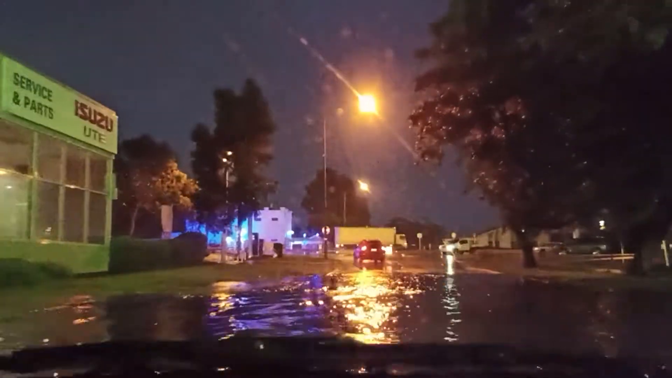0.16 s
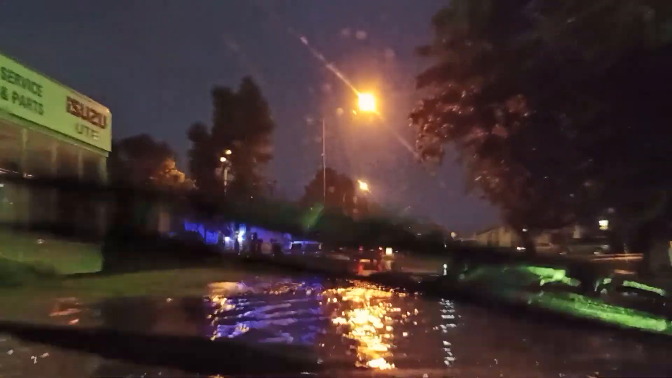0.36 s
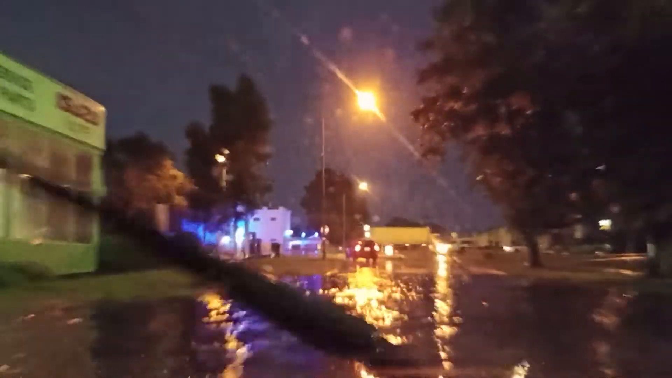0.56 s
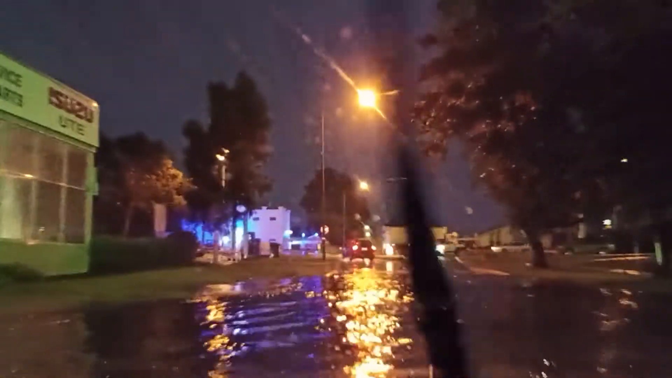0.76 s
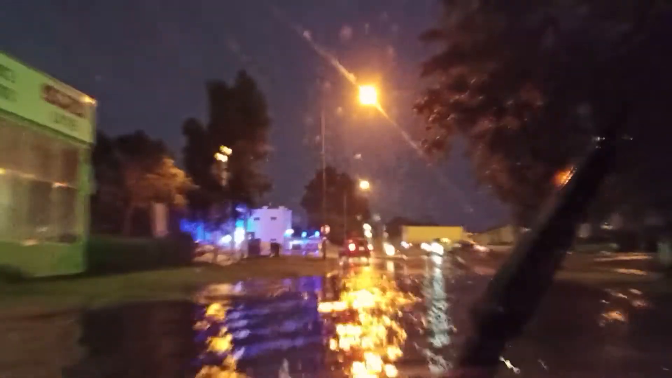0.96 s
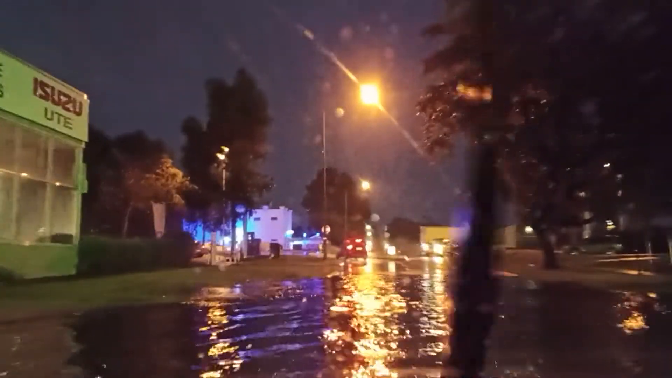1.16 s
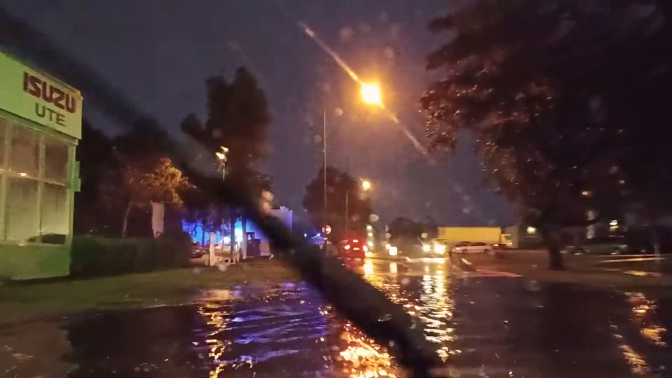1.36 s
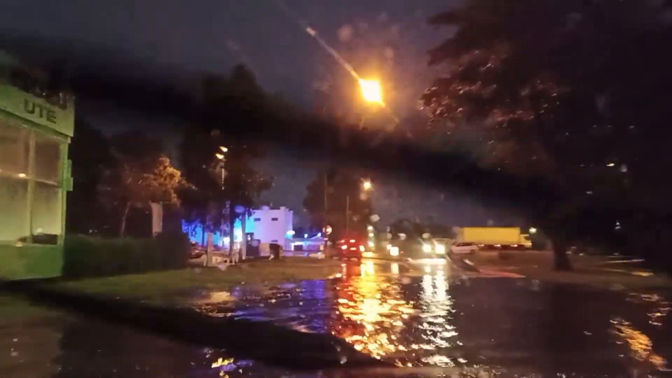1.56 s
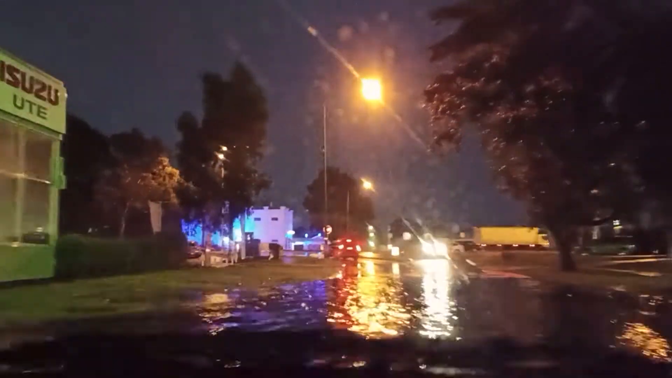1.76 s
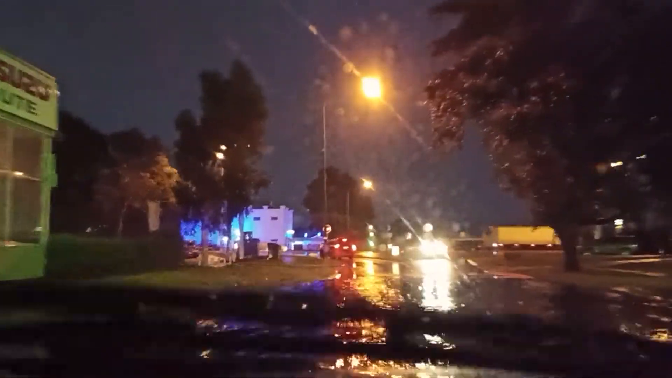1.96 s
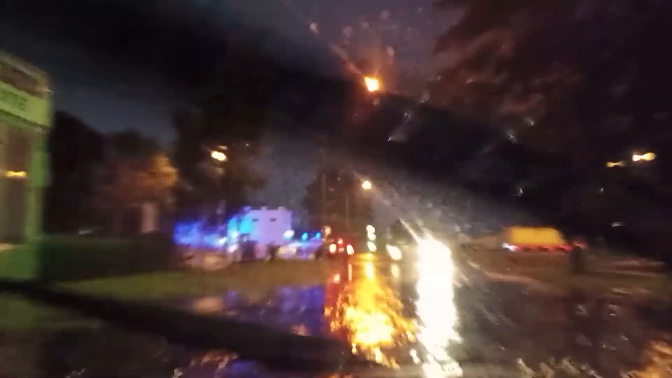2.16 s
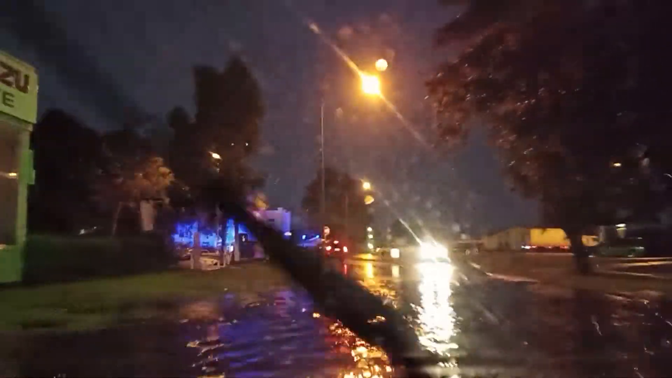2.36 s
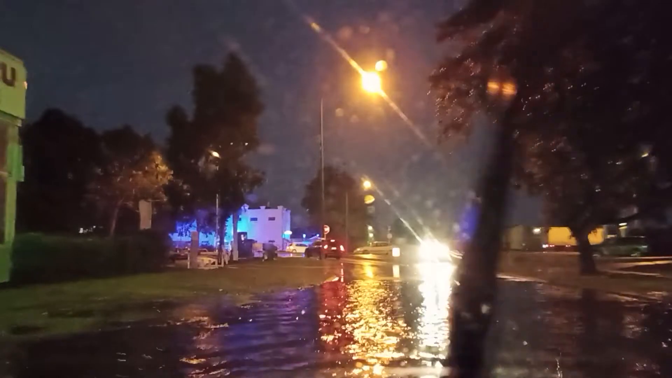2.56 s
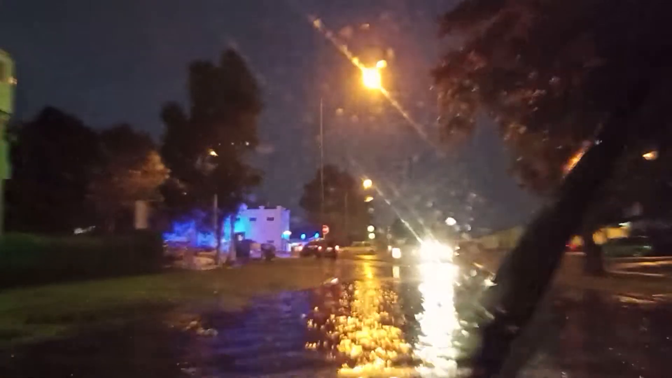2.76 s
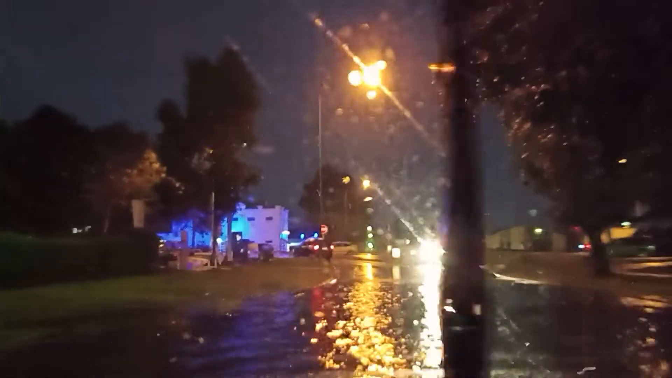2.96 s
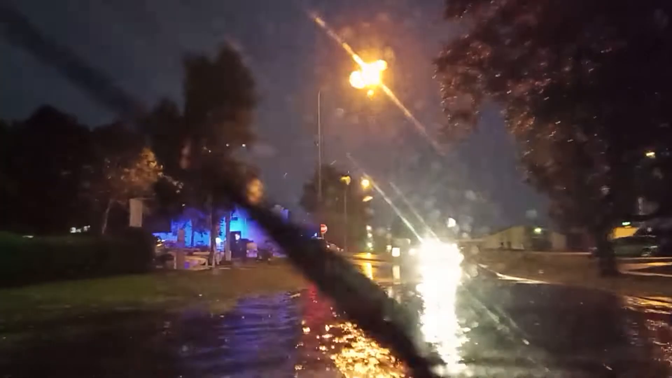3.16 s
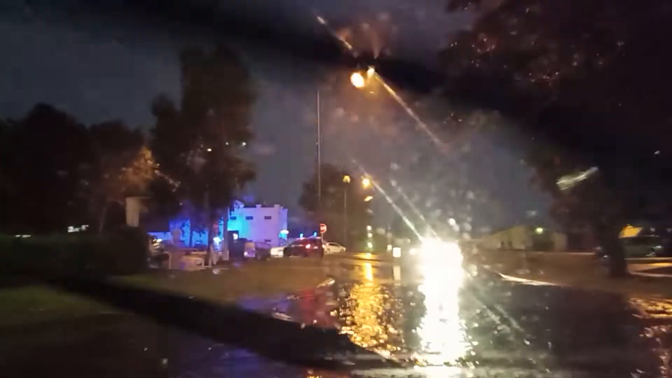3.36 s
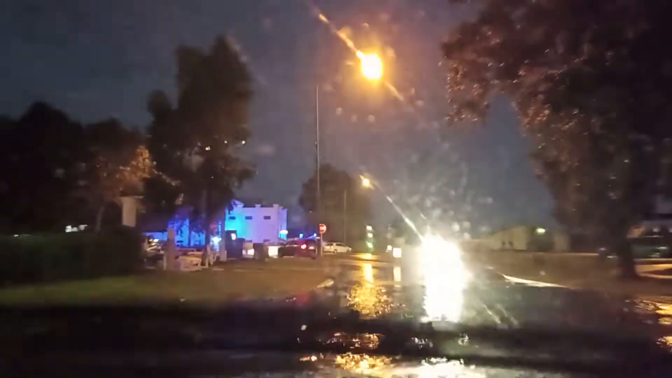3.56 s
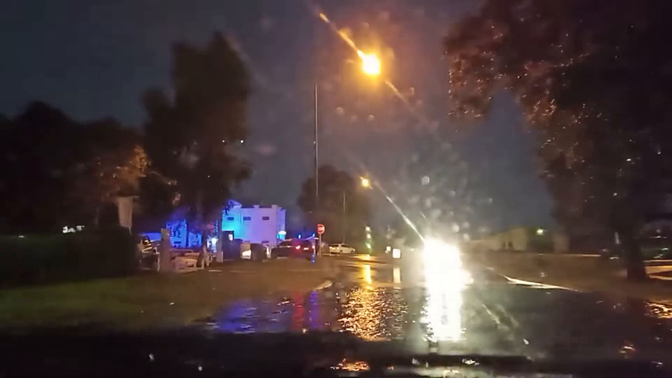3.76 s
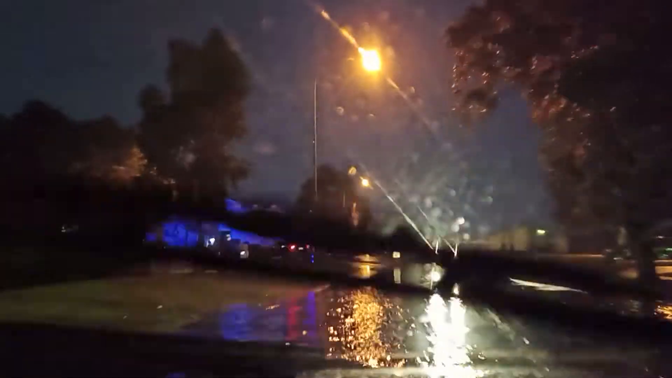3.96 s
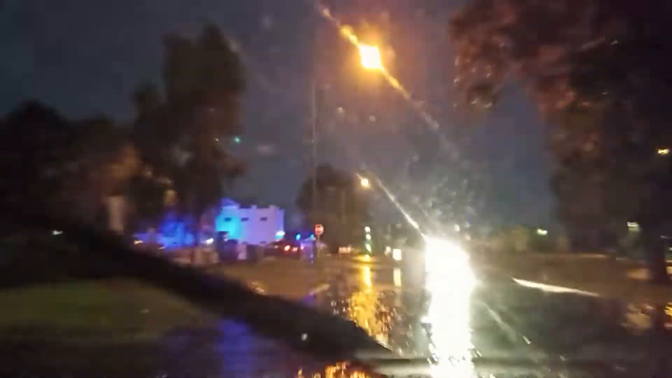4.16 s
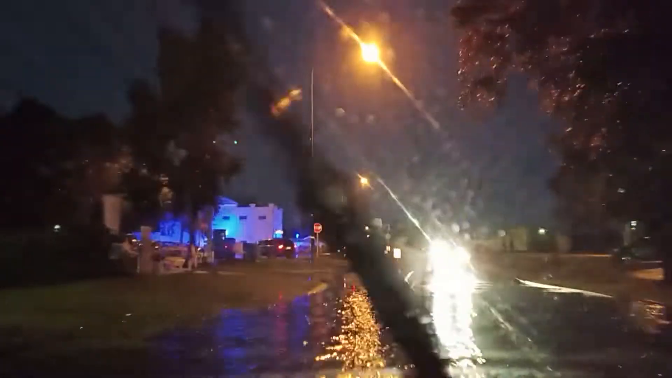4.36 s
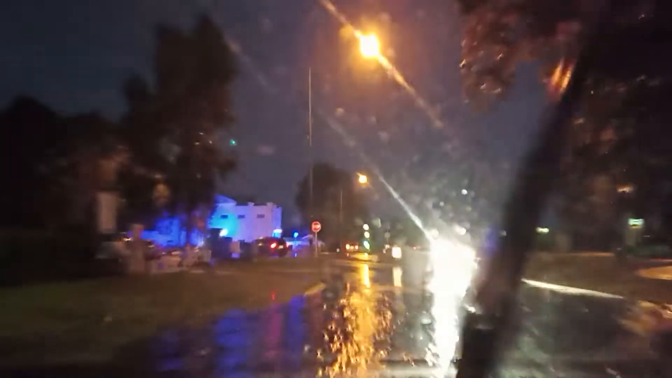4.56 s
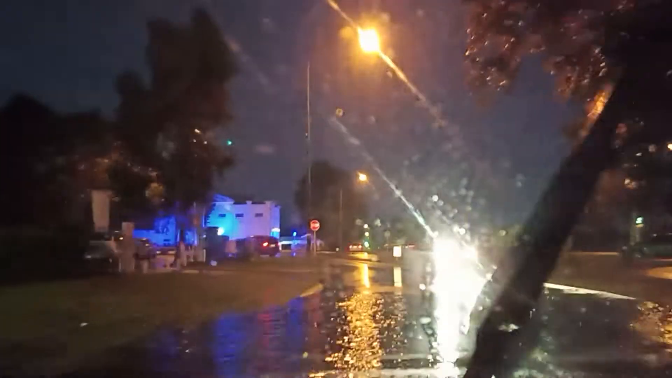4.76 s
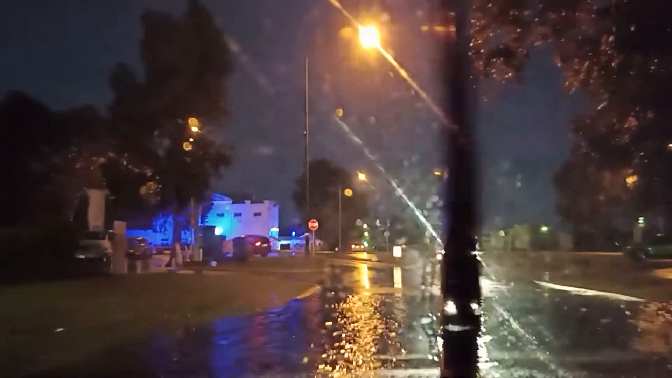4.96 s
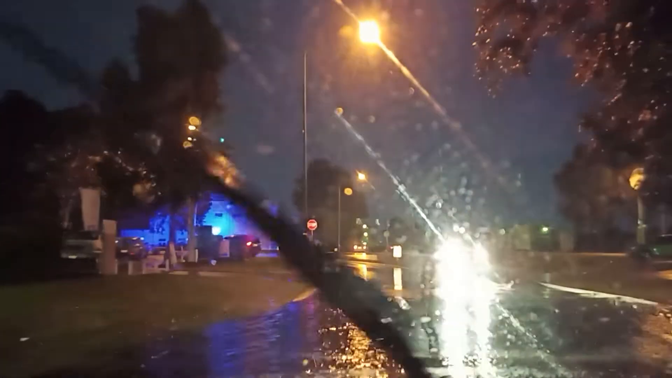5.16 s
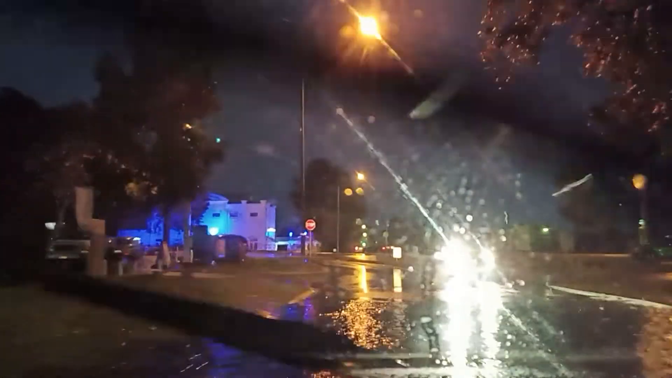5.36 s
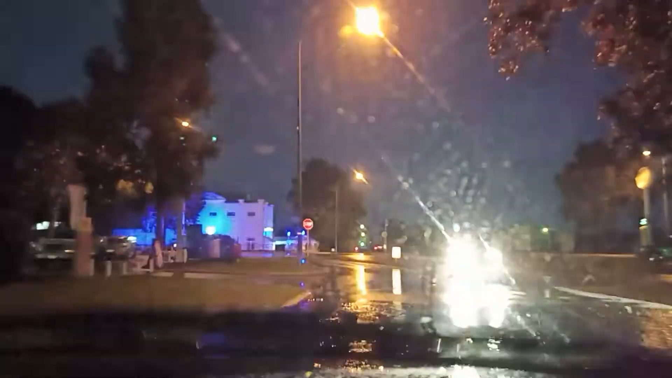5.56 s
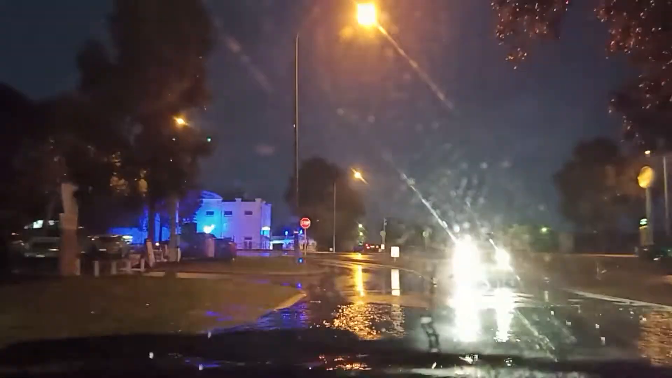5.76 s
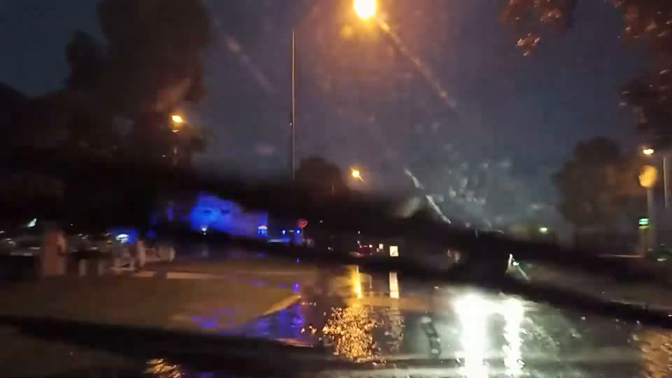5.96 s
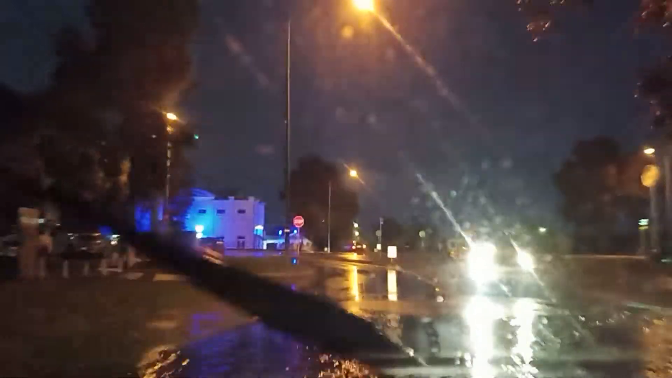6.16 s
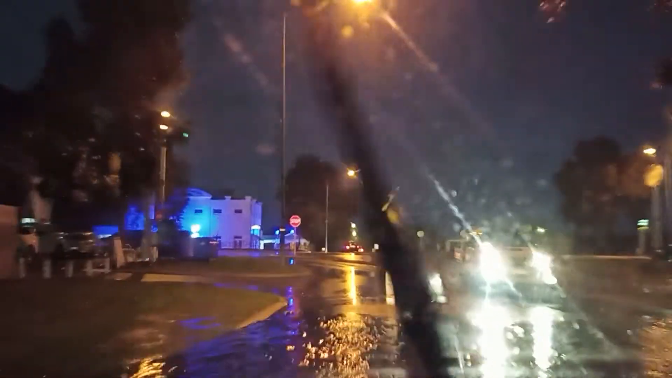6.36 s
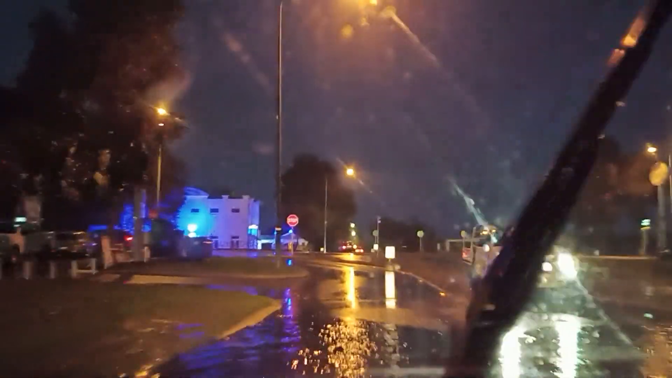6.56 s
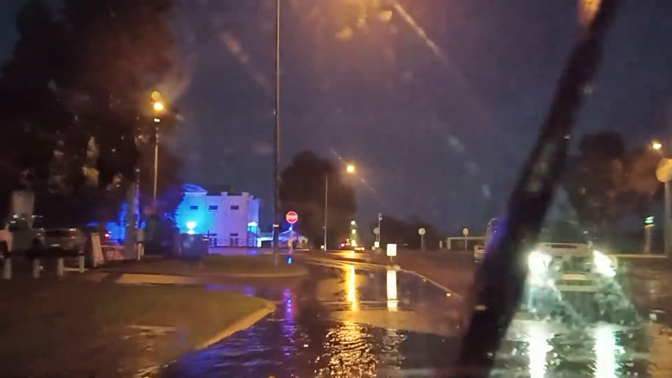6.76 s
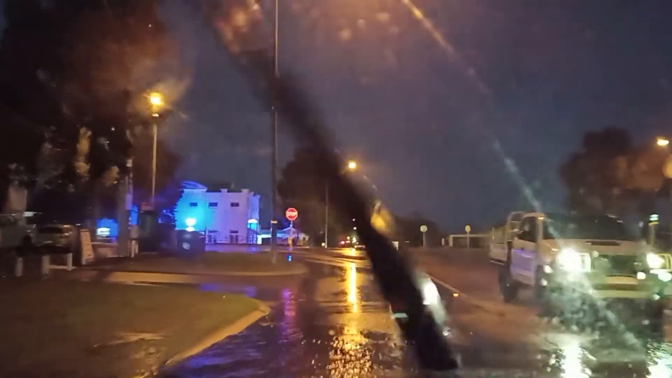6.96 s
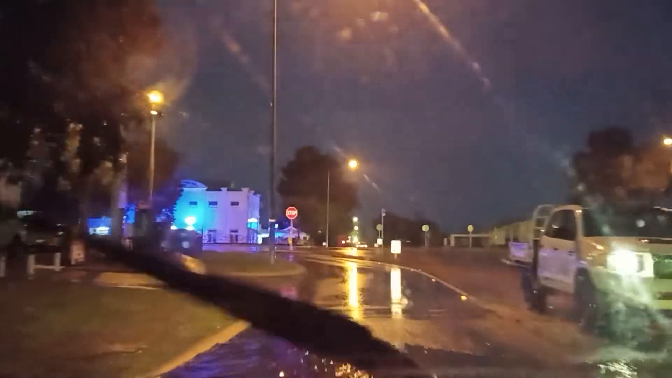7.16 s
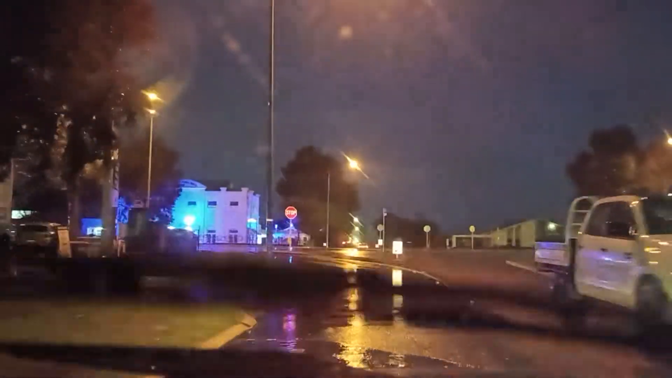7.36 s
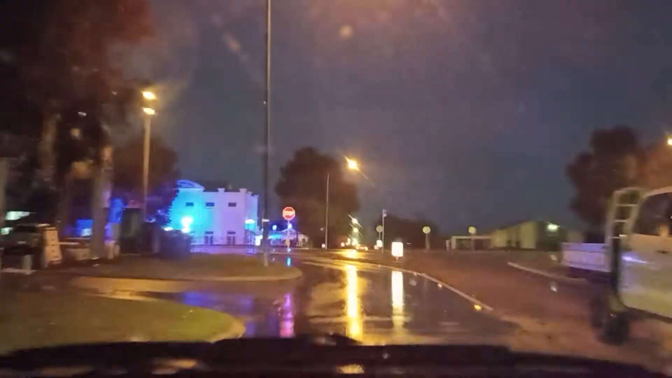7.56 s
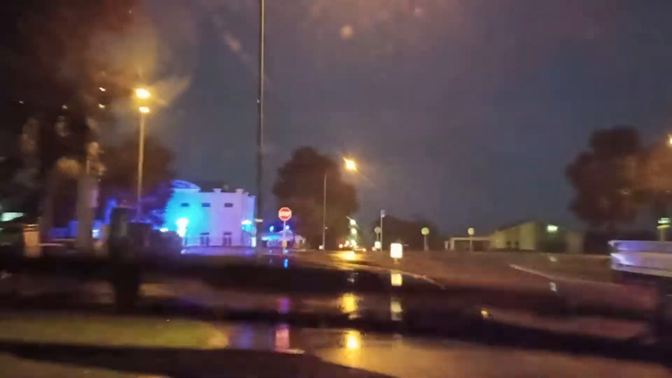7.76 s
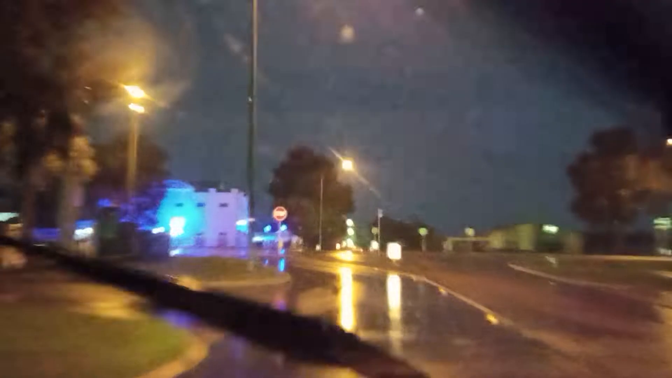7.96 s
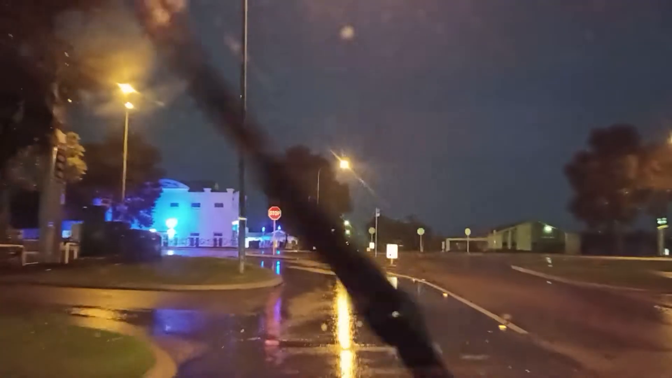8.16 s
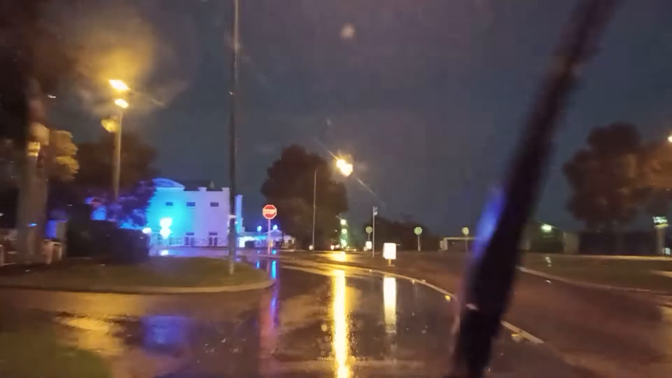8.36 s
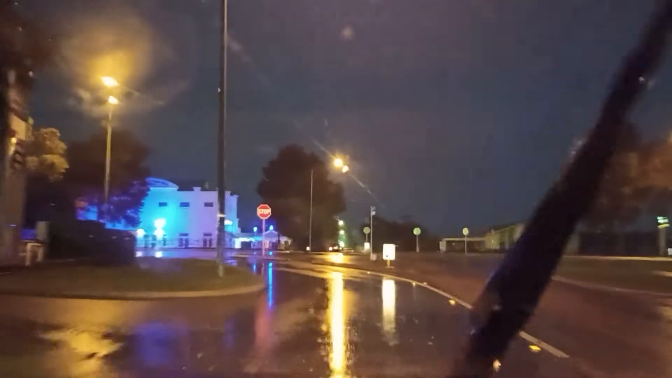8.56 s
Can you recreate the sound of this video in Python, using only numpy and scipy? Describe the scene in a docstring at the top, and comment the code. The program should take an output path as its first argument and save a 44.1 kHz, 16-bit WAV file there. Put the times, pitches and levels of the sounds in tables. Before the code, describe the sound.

From the front seat on a flooded road in rain, dark low water roar and engine hum fill the small dry cabin. Wiper blades flip with a dull thud and rubbery swish at the bottom, knock again at the top, and rattle in their joints. A thin bright buzz rides on the engine's vibration until around five seconds; then the engine eases off and the water swells briefly before settling.

```python
"""The engine of a car drones as harmonics of its firing rate, then eases off on a flooded road in heavy rain.
Water churns under the floor, tyres rumble and rain hisses on the body: shaped noise mixed with random impacts.
The wipers swish as gated noise, and knock at the turns of their stroke as damped panel tones, slaps and clicks.
A small loose part near the microphone buzzes: each shake of the car excites its resonances with a brief chatter."""
import sys
import numpy as np
from scipy import signal
from scipy.fft import rfft, irfft, next_fast_len
from scipy.io import wavfile
from scipy.ndimage import uniform_filter1d, map_coordinates

SR = 44100
rng = np.random.default_rng(int(sys.argv[2]) if len(sys.argv) > 2 else 0)


def output_pcm(signal):
    """Save a mono or channel-first signal as 16-bit PCM at the path in sys.argv[1].

    Samples are clipped to [-1, 1] before scaling.
    """
    pcm = np.clip(np.atleast_2d(signal).T, -1, 1) * 32767
    wavfile.write(sys.argv[1], SR, np.round(pcm).astype(np.int16))


N = 383669  # length in samples

# Engine course. Each row: time in seconds, firing rate in Hz, drone level in dB.
ENGINE_COURSE = [(0, 62.4, -24.5), (.4, 60.92, -22.5), (1.04, 59.6, -20.5), (1.75, 61.6, -23.5),
                 (2.2, 61.1, -24.5), (2.55, 58.6, -24), (3.08, 61.57, -23.5), (3.75, 62.16, -27),
                 (4.13, 56.78, -22), (4.6, 58.9, -25), (5.08, 62.7, -29), (5.45, 60, -27),
                 (5.75, 61.1, -27), (6.05, 65.8, -36), (6.6, 58, -40), (7, 49.07, -39.5), (8, 47.5, -35),
                 (8.7, 53, -35.5)]
# Air mode of the cabin: centre and half-width in Hz. It passes the second harmonic best at its centre.
BOOM_HZ, BOOM_WIDTH_HZ = 118.3, 7.3
SECOND_DB, THIRD_DB = -9, -17  # harmonics relative to the drone, the second at the centre of the mode

# All spectra below are relative: each shapes a sound whose level is set elsewhere.
# Water course. Each row: time in seconds, churn level in dB, wash level in dB.
WATER_COURSE = [(0, -31, -36), (1, -29, -35), (3.5, -30.5, -36.5), (5, -29, -34), (6.3, -27, -33.5),
                (7.4, -30.5, -36), (8.7, -31, -38)]
# Water against the floor. Each row: frequency in Hz, density in dB per Hz.
CHURN_SPECTRUM = [(52, -17.5), (88, -0.5), (108, 0), (129, 3), (150, -0.5), (187, 1), (265, -7),
                  (300, -10.5), (330, -5.5), (430, -21.5), (730, -120)]
# Spray in the wheel arches. Each row: frequency in Hz, density in dB per Hz.
WASH_SPECTRUM = [(60, -43), (150, -10), (260, -2.5), (300, -1), (390, -5.5), (530, -6.5), (600, -11),
                 (820, -19), (1100, -24.5), (1450, -27), (1750, -27.5), (2300, -47), (6000, -110)]
# Tyre course. Each row: time in seconds, rumble level in dB.
ROAD_COURSE = [(0, -61), (3.5, -49), (5.3, -40), (6.7, -37), (7.3, -37.5), (8.7, -36)]
# The tyres heard through the body. Each row: frequency in Hz, density in dB per Hz.
RUMBLE_SPECTRUM = [(15, -50), (25, -21), (35, -8), (48, -1), (62, 0), (78, -2), (100, -9), (140, -25),
                   (400, -120)]
# Rain course. Each row: time in seconds, hiss level in dB.
RAIN_COURSE = [(0, -55.5), (2.5, -51), (4.3, -53), (5.4, -51.5), (8.7, -49.5)]
# Rain heard through the glass. Each row: frequency in Hz, density in dB per Hz.
HISS_SPECTRUM = [(1120, -25), (1900, -2.5), (2460, -4), (2730, -2.5), (4220, -1.5), (4820, -2.5),
                 (5600, -7), (6070, -6), (6750, -11), (8270, -9), (10600, -25), (12200, -24.5),
                 (14800, -20), (15800, -30)]

# Wiper cycles. Each row: flip at the foot of the glass in seconds, relative swish level in dB, swish rise
# in seconds, relative drag level in dB, turn at the top in seconds, relative swish level there in dB,
# relative thud level there in dB.
WIPER_CYCLES = [(.334, -26.5, 0.081, -32.5, 1.018, -32.5, -10), (2.011, -23, .018, -26.5, 2.8, -29.5, -5.5),
                (3.958, -26, 0.093, -27, 4.646, -31, -11.5), (5.872, -23, 0.02, -27, 6.711, -30, -5),
                (7.775, -24.5, .05, -32.5, 8.533, -33, -9.5)]
# Rubber juddering on the windscreen. Each row: frequency in Hz, density in dB per Hz.
SWISH_SPECTRUM = [(88, -47), (150, -6), (352, 0), (417, -14.5), (511, -5.5), (661, -18.5), (740, -14.5),
                  (1150, -36), (2200, -57), (2860, -66), (4840, -120)]
# The wet edge of the swish. Each row: frequency in Hz, density in dB per Hz.
SPRAY_SPECTRUM = [(200, -38), (500, -33), (1000, 7), (1700, 1), (2400, -6), (4000, -5), (6500, -15),
                  (8200, -14), (10000, -38), (15000, -33)]
SWISH_LAG_S, SWISH_FALL_S = 0.0067, 0.053  # the swish peaks just after the flip and dies away
TOP_RISE_S, TOP_FALL_S = 0.022, 0.054  # the swish at the top of the glass
DRAG_LAG_S, DRAG_WIDTH_S = 0.2, 0.2  # the upstroke pulls hardest this long after the flip

# Knocks of the wiper linkage. Each row: time in seconds, relative thud level in dB, pitch in Hz,
# relative slap level in dB, relative click level in dB.
LINKAGE_KNOCKS = [(.4444, -13, 111, -23.5, -31), (0.5354, -9.5, 182, -28, -24.5),
                  (2.164, -10.5, 125, -27, -26.5), (2.2557, -7.5, 139, -31, -19.5),
                  (4.127, -7, 151, -28, -25.5), (4.238, -17.5, 164, -38, -32.5),
                  (4.531, -22, 110, -27, -24), (4.723, -11, 168, -26, -43), (6.027, -19, 200, -23, -28.5),
                  (6.1, -13.5, 147.5, -30, -26.5), (6.2228, -16, 177, -28, -21),
                  (7.886, -15, 108.2, -24, -30.5), (7.979, -11.5, 204, -24.5, -32),
                  (8.262, -17, 201.2, -32, -35), (8.451, -21.5, 318, -32, -28)]
# The glass under a blow. Each row: frequency in Hz, density in dB per Hz.
SLAP_SPECTRUM = [(120, 2), (280, -5.5), (520, -3), (800, -10), (1500, -20.5), (2500, -32), (6000, -56)]
# The snap of a wiper joint. Each row: frequency in Hz, density in dB per Hz.
CLICK_SPECTRUM = [(300, 16), (600, 12), (1200, 5), (2000, 0), (2400, 0), (3800, 5.5), (5200, 1.5),
                  (6800, -4), (8300, -3), (10000, -19), (15000, -23)]
# Decay of the upholstered cabin. Each row: frequency in Hz, time to fall by 60 dB in seconds.
CABIN_DECAY = [(100, 0.68), (400, 0.11), (2000, 0.11), (10000, 0.014)]
FLIP_DB, FLIP_HZ, FLIP_SLAP_DB = -13.5, 168, -21  # blades flipping over at the foot, relative levels
TOP_THUD_HZ, TOP_SLAP_DB = 163.3, -29  # blades turning at the top, relative level

# Shaking of the car by the drivetrain. Each row: time in seconds, shakes per second.
SHAKE_COURSE = [(0.5, 39.44), (1.1, 38.7), (1.9, 38.66), (2.55, 38.12), (3.1, 38.51), (3.8, 38.03),
                (4.2, 38.22), (4.7, 37.09), (5.2, 35.06)]
# Bouts in which the loose part rattles. Each row: start in seconds, end in seconds, relative level in dB.
RATTLE_BOUTS = [(.47, .595, -52.5), (.62, .67, -50.5), (.725, .775, -55), (.8, .925, -54),
                (.925, 2.528, -44), (2.53, 2.65, -48), (2.65, 4.035, -45), (4.42, 4.445, -54),
                (4.475, 4.69, -52), (4.69, 4.9, -47), (4.9, 5.07, -49.5), (5.07, 5.17, -54)]
# Resonances of the loose part. Each row: frequency in Hz, half-width in Hz, relative level in dB.
PART_MODES = [(1430, 60, -8), (2805, 50, -4), (2955, 70, -2), (3112, 50, -4), (3720, 60, -7),
              (3835, 80, -1), (4895, 100, 0), (5070, 100, 1.5), (5425, 70, -3), (5640, 90, -5),
              (5970, 120, -8), (6686, 70, -3), (6925, 80, -2.5), (7145, 80, -5.5), (7820, 70, -4),
              (8010, 90, -2), (8280, 110, -4), (8775, 90, -11), (9222, 90, -4), (9518, 90, -7),
              (10088, 100, -8), (11063, 120, -16), (12866, 120, -13), (13571, 130, -13), (14520, 200, -11),
              (14850, 180, -11)]
# Its dry contact noise. Each row: frequency in Hz, density in dB per Hz.
SCRAPE_SPECTRUM = [(600, -62), (1500, -13), (2200, -5), (2800, -5), (5200, -3), (6300, -6), (8300, 0),
                   (9700, -15.5), (12000, -12.5), (15000, -12), (15600, -16)]
RING_HZ = 8113
MODES_DB, SCRAPE_DB, RING_DB = -3.5, -5, -7  # balance of the three parts of the buzz
FULL_RATTLE_DB = -42.5  # from this level up the part strikes with its full brightness
# For each dB below that level: dB of top octave lost, of ring kept and of resonances lost.
DULLING, RING_KEPT, MODES_LOST = 0.45, 0.28, 0.2
UNEVEN = 0.11  # dB of scatter between shakes for each dB away from that level

TOP_HZ = 15600  # upper band limit


def amp(db):
    """Level law: decibels to amplitude gain."""
    return 10 ** (np.asarray(db) / 20)


def unit(x):
    """Normalisation: x at an rms of 1."""
    return x / np.sqrt(np.mean(x ** 2) + 1e-20)


def along(points, hz):
    """Interpolation: (Hz, value) points read on a logarithmic frequency axis."""
    f, v = np.transpose(points)
    return np.interp(np.log(hz + 1), np.log(f + 1), v)


def curves(rows):
    """Interpolation: one value per sample for each column after the time."""
    s, *columns = np.transpose(rows)
    return [np.interp(np.arange(N) / SR, s, column) for column in columns]


def wobble(rate):
    """Slow fluctuation: a spline through random knots, rate of them a second."""
    knots = rng.standard_normal(int(N * rate / SR) + 4)
    return map_coordinates(knots, [np.arange(N) * rate / SR])


def filtered(x, response):
    """Linear filtering: the spectrum of x times a response of frequency."""
    m = next_fast_len(len(x) + SR // 5)  # padded against wrap-around
    return irfft(rfft(x, m) * response(np.fft.rfftfreq(m, 1 / SR)), m)[:len(x)]


def coloured(x, spectrum):
    """Spectral shaping: x filtered by a (Hz, dB) spectrum, at an rms of 1."""
    return unit(filtered(x, lambda hz: amp(along(spectrum, hz))))


def rush(spectrum, patchy_db):
    """Turbulence: shaped noise of rms 1 with random gain in patches of time and frequency."""
    z = signal.stft(rng.standard_normal(N), nperseg=1024)[2]
    field = uniform_filter1d(rng.standard_normal(z.shape), size=5, axis=0)
    field = uniform_filter1d(field, size=6, axis=1)
    noise = signal.istft(z * amp(patchy_db * unit(field)), nperseg=1024)[1][:N]
    return coloured(noise, spectrum)


def drops(spectrum, rate, spread_db):
    """Shot noise: random impacts of unequal size, rate of them a second on average, at an rms of 1."""
    hits = rng.random(N) < rate / SR
    sizes = amp(spread_db * np.clip(rng.standard_normal(N), -2, 2))
    signs = rng.choice([-1, 1], N)
    return coloured(hits * sizes * signs, spectrum)


def flurry(envelope):
    """Random contacts: a noise run under an envelope, equally strong at all frequencies."""
    x = rng.standard_normal(len(envelope))
    for _ in range(3):  # alternately impose the envelope and flatten the spectrum
        phases = np.angle(rfft(x * np.cbrt(envelope)))
        x = irfft(np.exp(1j * phases), len(envelope))
    return unit(x)


def add(track, s, sound):
    """Superposition: mix a sound into the track at time s."""
    start = max(round(s * SR), 0)
    part = track[start:start + len(sound)]
    part += sound[:len(part)]


def engine():
    """Harmonic series: the firing rate drones, and its second harmonic swells as it crosses an air mode."""
    hz, drone_db = curves(ENGINE_COURSE)
    phase = 2 * np.pi * np.cumsum(hz * (1 + 0.0038 * wobble(12))) / SR
    drone = amp(1.55 * wobble(24)) * np.sin(phase)
    boom = 1 / np.hypot(1, (2 * hz - BOOM_HZ) / BOOM_WIDTH_HZ)
    second = amp(SECOND_DB) * boom * np.sin(2 * phase)
    third = amp(THIRD_DB) * np.sin(3 * phase)
    overtones = amp(1.2 * wobble(3.58)) * (second + third)
    return np.sqrt(2) * amp(drone_db + 0.6 * wobble(7)) * (drone + overtones)


def floodwater():
    """Turbulence and impact noise: water slaps the floor, spray washes the wheel arches, tyres rumble."""
    churn_db, wash_db = curves(WATER_COURSE)
    rumble_db, = curves(ROAD_COURSE)
    slaps = drops(CHURN_SPECTRUM, rate=90, spread_db=3)
    churn = unit(rush(CHURN_SPECTRUM, patchy_db=0.0) + amp(-2.5) * slaps)
    splashes = drops(WASH_SPECTRUM, rate=260, spread_db=4)
    wash = unit(rush(WASH_SPECTRUM, patchy_db=1.0) + amp(-7.5) * splashes)
    water = amp(churn_db + 1.2 * wobble(6)) * churn + amp(wash_db + 0.35 * wobble(5)) * wash
    return water + amp(rumble_db) * rush(RUMBLE_SPECTRUM, patchy_db=1.5)


def rain():
    """Shot noise at high density: drops on glass and roof merge into a hiss."""
    hiss_db, = curves(RAIN_COURSE)
    single_drops = drops(HISS_SPECTRUM, rate=700, spread_db=5)
    patter = unit(rush(HISS_SPECTRUM, patchy_db=0.7) + amp(-8) * single_drops)
    return amp(hiss_db + 0.53 * wobble(3.8)) * patter


def swell(s, rise, fall):
    """Exponential growth and decay: an envelope that peaks at time s."""
    t = np.arange(N) / SR
    return np.exp(-np.maximum((s - t) / rise, (t - s) / fall))


def swishes():
    """Friction judder: at each turn wet rubber drives the windscreen, which sounds like a dull drum."""
    strength = np.zeros(N)
    for flip, foot_db, rise, _, top, top_db, _ in WIPER_CYCLES:
        strength += amp(foot_db) * swell(flip + SWISH_LAG_S, rise, SWISH_FALL_S)
        strength += amp(top_db) * swell(top, TOP_RISE_S, TOP_FALL_S)
    jerks = drops(SWISH_SPECTRUM, rate=300, spread_db=2.5)
    judder = unit(rush(SWISH_SPECTRUM, patchy_db=1.0) + amp(2.5) * jerks)
    wet_edge = drops(SPRAY_SPECTRUM, rate=1200, spread_db=4)
    return strength * (amp(3.0) * judder + amp(-16) * wet_edge)


def drag():
    """Flow resistance: the blades push water up the glass, and the body rumbles under the strain."""
    t = np.arange(N) / SR
    strain = np.zeros(N)
    for flip, _, _, drag_db, *_ in WIPER_CYCLES:
        strain += amp(drag_db) * np.exp(-0.5 * ((t - flip - DRAG_LAG_S) / DRAG_WIDTH_S) ** 2)
    return strain * (rush(CHURN_SPECTRUM, patchy_db=1.0) + amp(-8) * rush(WASH_SPECTRUM, patchy_db=1.0))


def cabin(sound, wet_db):
    """Reverberation: a short sound followed by a fresh noise tail that decays at its own rate in each band."""
    hz, t, z = signal.stft(rng.standard_normal(SR // 5), SR, nperseg=256)
    decay = amp(-60 * t / along(CABIN_DECAY, hz)[:, None])
    tail = signal.istft(z * decay, SR, nperseg=256)[1]
    echo = signal.fftconvolve(sound, tail / np.linalg.norm(tail))[:len(sound)]
    return sound + amp(wet_db) * echo


def thud(db, hz, slap_db):
    """Damped modes: a blow on the body gives a short low ring of the panel and a slap on the glass."""
    t = np.arange(SR // 5) / SR
    push = (1 - np.exp(-(t / 0.003) ** 2)) * amp(-60 * t / 0.052)
    overtone = amp(-11.5 - 60 * t / 0.049) * np.sin(2 * np.pi * 1.95 * hz * t)
    panel = np.sin(2 * np.pi * hz * t) + overtone
    slap_envelope = (1 - np.exp(-t / 0.0011)) * amp(-60 * t / 0.073)
    slap = slap_envelope * coloured(rng.standard_normal(len(t)), SLAP_SPECTRUM)
    return cabin(amp(db + 3.5) * push * panel + amp(slap_db) * slap, wet_db=-11.0)


def click():
    """Impulsive contact: a wiper arm snaps across the play in its joint."""
    t = np.arange(SR // 5) / SR
    fade = amp(-60 * t / 0.022)
    onset = 1 - np.exp(-t / 0.0003)
    snap = coloured(flurry(fade), CLICK_SPECTRUM) * onset * np.sqrt(fade)
    return cabin(amp(-18.5) * snap, wet_db=-6)


def knocks():
    """Impact: the wipers thud at both ends of the stroke; in between the linkage takes up its play."""
    track = np.zeros(N)
    for flip, _, _, _, top, _, top_db in WIPER_CYCLES:
        add(track, flip, thud(FLIP_DB, FLIP_HZ, FLIP_SLAP_DB))
        add(track, top, thud(top_db, TOP_THUD_HZ, TOP_SLAP_DB))
    for s, thud_db, hz, slap_db, click_db in LINKAGE_KNOCKS:
        add(track, s, thud(thud_db, hz, slap_db) + amp(click_db) * click())
    return track


def part_response(hz):
    """Resonance: summed squared Lorentzian peaks of the loose part."""
    return sum(amp(db) / (1 + ((hz - centre) / width) ** 2) ** 2 for centre, width, db in PART_MODES)


def rattle():
    """Forced vibration: in a bout, each shake gives nearly the same brief chatter, then the part rings."""
    rate, = curves(SHAKE_COURSE)
    shakes = np.flatnonzero(np.diff(np.floor(np.cumsum(rate) / SR))) / SR
    t = np.arange(SR // 25) / SR
    contact = np.exp(-0.5 * ((t - 0.0135) / 0.005) ** 2)
    afterring = np.exp(-0.5 * ((t - 0.0195) / 0.0035) ** 2)
    habit = flurry(contact)  # the share of the chatter that every shake repeats
    chatter, ringing, level_db = np.zeros(N), np.zeros(N), np.full(N, -120.0)
    for s in shakes:
        s += 0.00002 * rng.standard_normal()
        size = amp(0.6 * rng.standard_normal())
        add(chatter, s, size * (habit + 0.4 * flurry(contact)))
        add(ringing, s, size * afterring)
        luck = rng.standard_normal()
        for start, end, db in RATTLE_BOUTS:
            if start <= s < end:
                scatter_db = UNEVEN * abs(FULL_RATTLE_DB - db) * luck
                level_db[round(s * SR):][:len(t) * 3 // 4] = db + scatter_db
    level = np.abs(uniform_filter1d(amp(level_db), size=SR // 300))  # steps smoothed
    force = np.clip(level / amp(FULL_RATTLE_DB), 1e-6, 1)
    ring_phase = 2 * np.pi * RING_HZ * np.arange(N) / SR + 0.8 * wobble(30)
    ring = unit(ringing * np.sin(ring_phase))
    modes = force ** MODES_LOST * unit(filtered(chatter, part_response))
    buzz = amp(MODES_DB) * modes + amp(SCRAPE_DB) * coloured(chatter, SCRAPE_SPECTRUM)
    # gentle contacts lack the top octave and are mostly ring
    top = filtered(buzz, lambda hz: 1 / (1 + (9500 / (hz + 1)) ** 8))
    dulled = buzz - (1 - force ** DULLING) * top
    return level * (dulled + amp(RING_DB) * ring / force ** RING_KEPT)


def scene():
    """Superposition: everything heard from the front seat, as one channel."""
    steady = engine() + floodwater() + rain()
    wipers = swishes() + drag() + knocks()
    return (steady + wipers + rattle())[None]


def record(dry):
    """Band limiting: the microphone loses the deepest bass, and nothing passes above the upper limit."""
    response = lambda hz: (hz < TOP_HZ) / np.sqrt(1 + (32 / (hz + 1)) ** 8)
    return np.array([filtered(channel, response) for channel in dry])


dry = scene()
out = record(dry)
output_pcm(out)
```